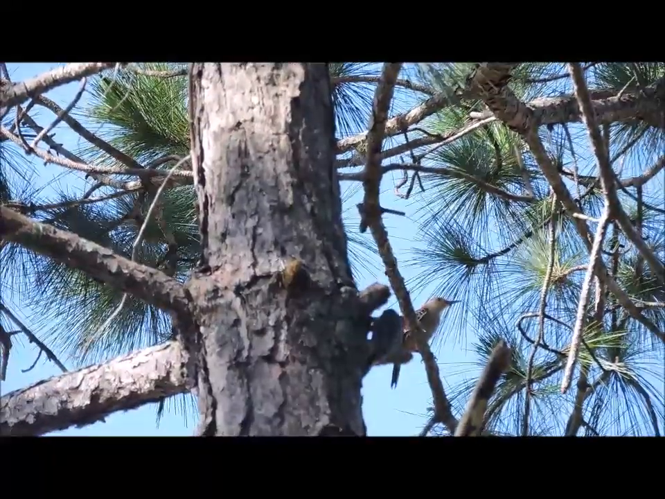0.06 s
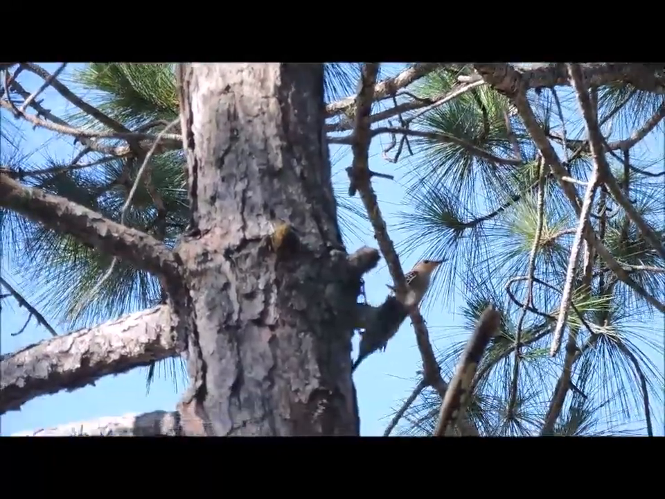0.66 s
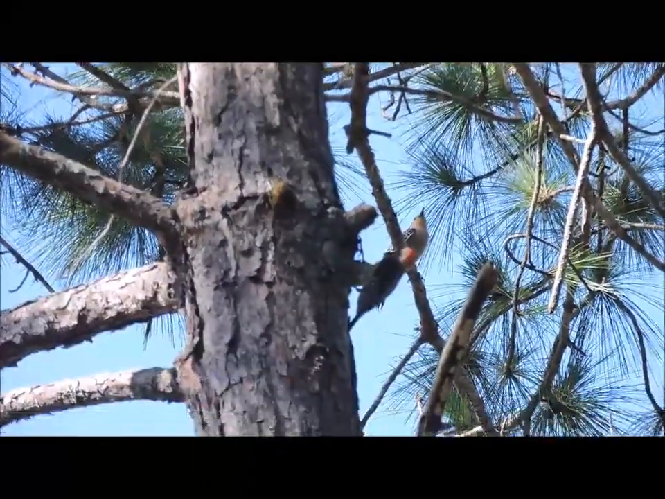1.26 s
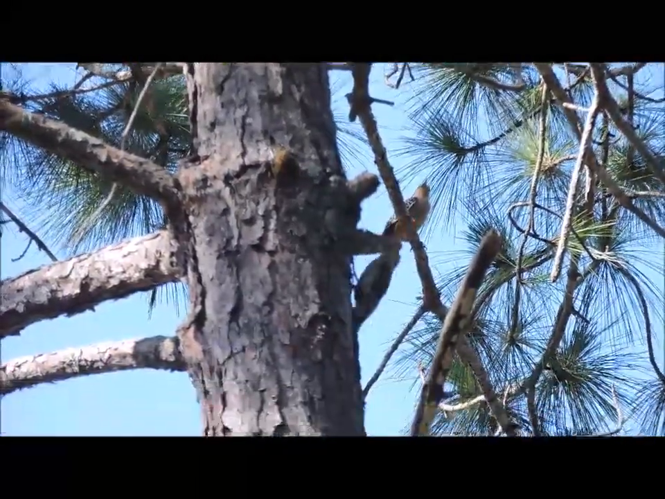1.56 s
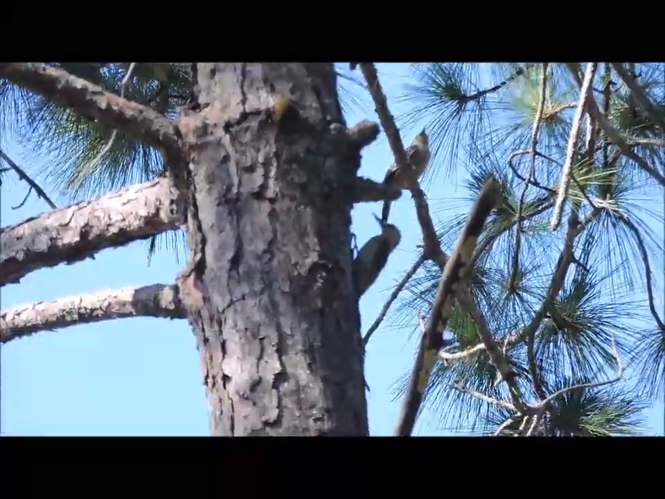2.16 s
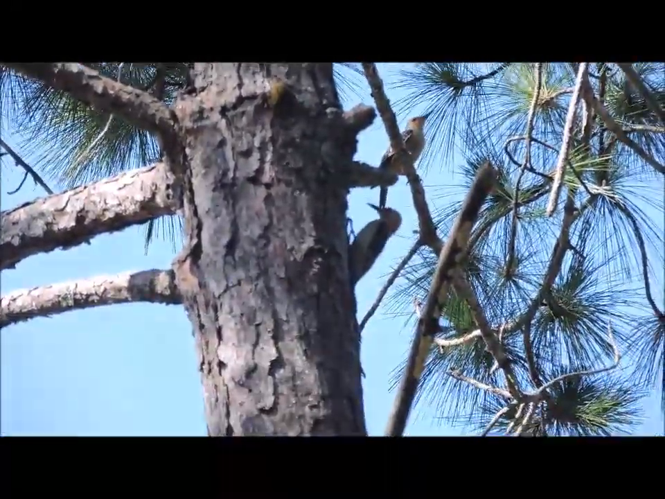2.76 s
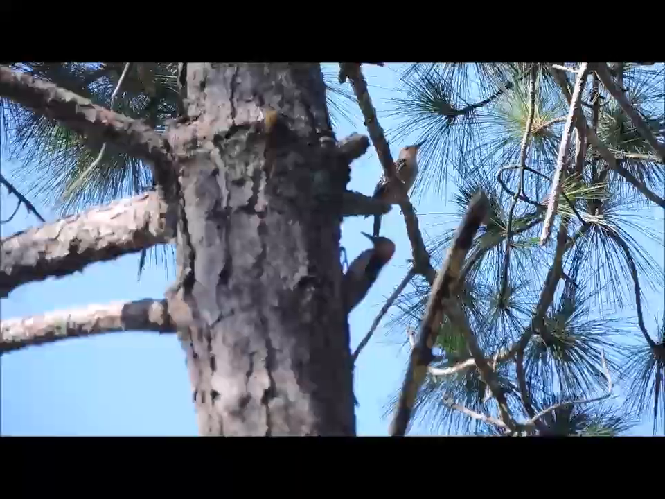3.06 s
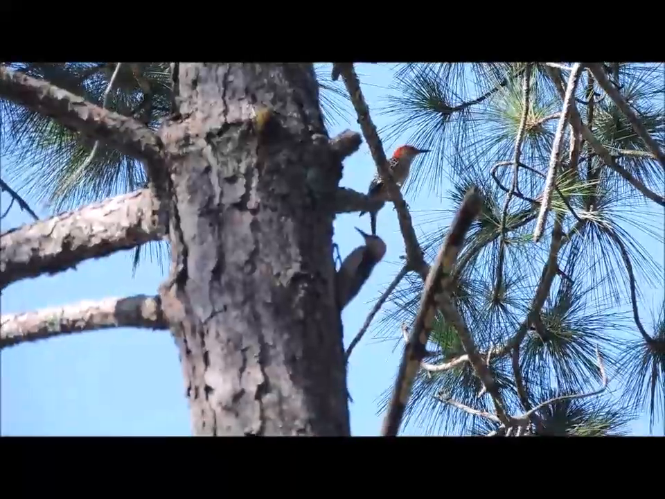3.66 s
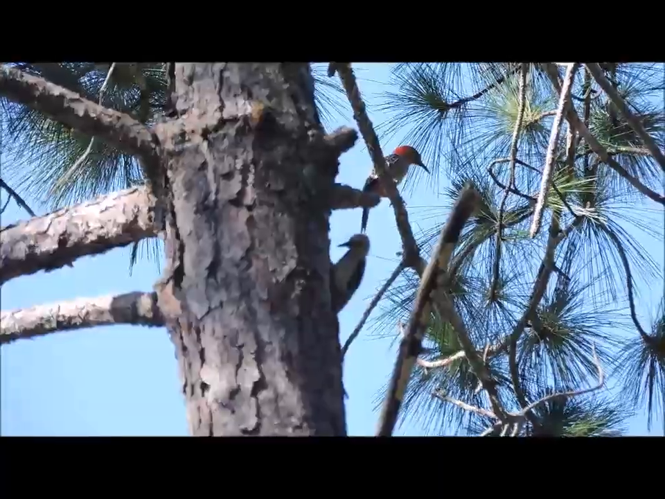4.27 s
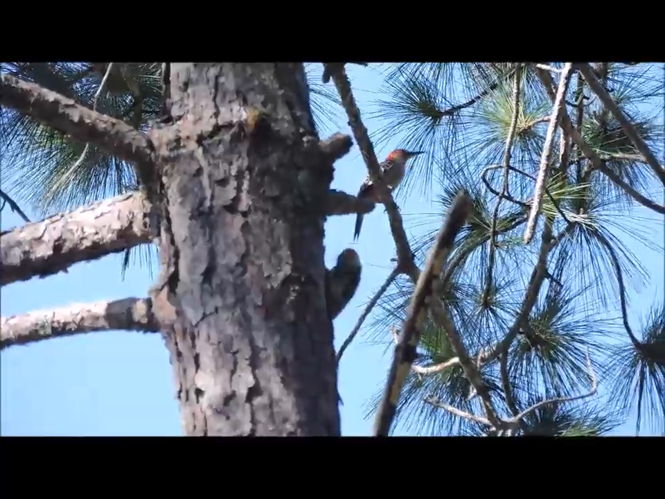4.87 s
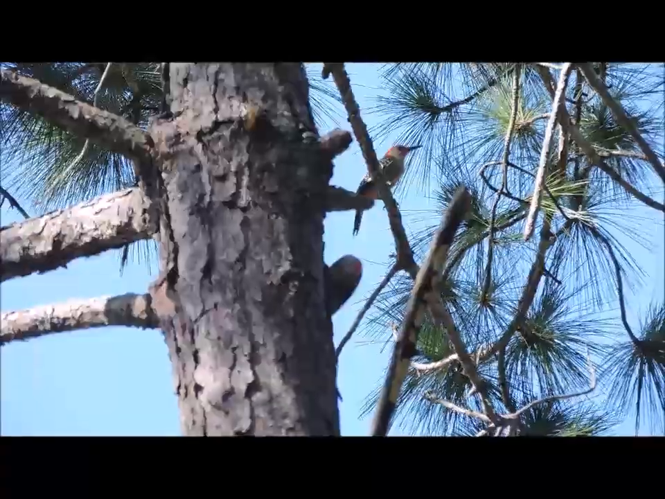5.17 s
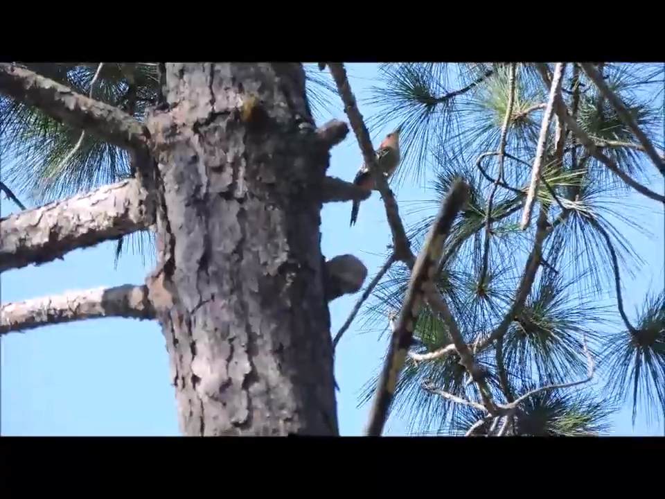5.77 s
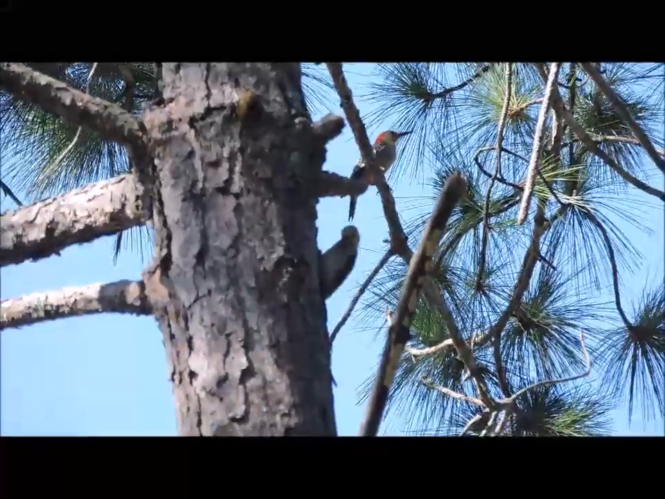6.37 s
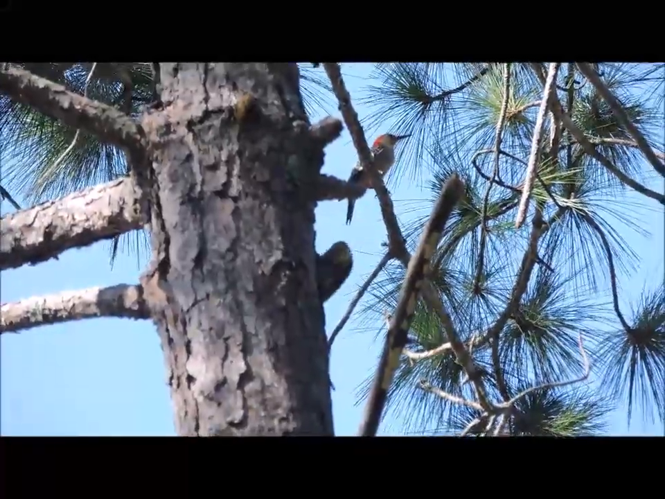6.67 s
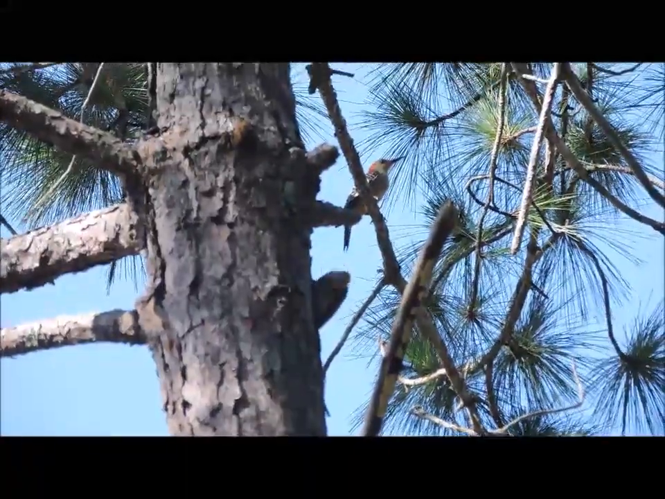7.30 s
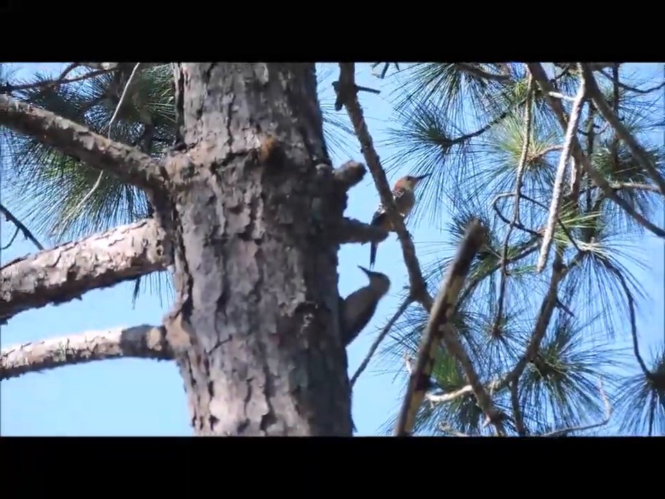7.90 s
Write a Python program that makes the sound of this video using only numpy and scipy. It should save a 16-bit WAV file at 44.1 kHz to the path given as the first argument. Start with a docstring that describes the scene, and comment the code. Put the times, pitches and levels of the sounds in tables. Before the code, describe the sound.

A brief low whump opens, and a woodpecker calls twice in soft, swooping whistles, a little to the left and lightly scattered by the trees. Four distant thuds follow, the last two louder with a faint scrape between them. Three quick, sharp chirps come next, then a final far-off knock. Low wind rumble, soft air in the pine needles and a faint distant hum continue underneath.

```python
"""Woodpeckers in a pine, over a low outdoor rumble, air in the needles and a faint machine hum.
A short, rough whump comes first, then two soft wavering calls, each a whistle scattered by the trees.
Four dull knocks carry from far off, with a faint rustle before the fourth. Three sharp chirps follow,
each a whistled arch and a zigzag of pitch. One last knock sounds near the end."""
import sys
import numpy as np
from scipy import signal
from scipy.fft import rfft, irfft, next_fast_len
from scipy.io import wavfile
from scipy.ndimage import map_coordinates

SR = 44100
rng = np.random.default_rng(int(sys.argv[2]) if len(sys.argv) > 2 else 0)


def dump(signal):
    """Clip the signal to [-1, 1] and save it as 16-bit WAV at the path in sys.argv[1]."""
    limited = np.clip(np.atleast_2d(signal).T, -1, 1)
    pcm = np.round(limited * 32767).astype(np.int16)
    wavfile.write(sys.argv[1], SR, pcm)


N = 350154

ARCH_ATTACK_S, RUN_UP_S, CHIRP_RELEASE_S = .026, .021, .0016


def wavering_calls():
    """Two calls of two slow swoops each; the last low note softens and breaks into a fast quiver."""
    # swoops, two to a call, each a high note that breaks to a low one:
    # start_s, rise_s, until_break_s, high_hz, drift_hz_per_s, low_hz, high_db, low_db
    swoops = [(0.710, 0.025, .068, 2450, -4500, 1580, -51, -54),
              (0.836, .052, .079, 2500, 0, 1662, -45.5, -51),
              (1.193, .020, .066, 2400, 3500, 1630, -51, -51.5),
              (1.318, .044, .074, 2620, -6500, 1570, -46.5, -52.5)]
    # the shape of each call: length_s, quiver_depth_hz, quiver_length_s, overtone_db
    wavers = [(0.338, 150, .098, -26), (0.342, 120, 0.055, -22.5)]
    attack_s, release_s, shimmer_db = .009, .014, 1.5
    quiver_rate_hz, quiver_lift_hz = 98, 74
    out = np.zeros((2, N))
    for pair, (length_s, depth_hz, quiver_s, overtone_db) in zip((swoops[:2], swoops[2:]), wavers):
        t = pair[0][0] + np.arange(0, length_s, 1 / SR)
        age, remaining = t - t[0], t[-1] - t
        hz, gain = swooping(t, pair)
        gain *= amp(shimmer_db * wobble(90)[:len(t)])  # the voice is never quite steady
        gain *= ramp(age / attack_s) * ramp(remaining / release_s)
        swell = ramp(2 * (1 - remaining / quiver_s))
        cycle = 2 * np.pi * quiver_rate_hz * (.003 - remaining)
        quiver = swell * (np.sin(cycle) + .18 * np.sin(2 * cycle))  # a quick rise and a slower fall
        tremolo = amp(3.5 * quiver)
        strain = np.interp(hz, [1800, 2700], [.010, .026])  # high notes are rougher
        bright_db = overtone_db + 2 - 40 * age  # the tone grows purer as the call goes on
        hz = hz + quiver_lift_hz * swell + depth_hz * quiver
        call = whistle(hz, gain * tremolo, strain, [bright_db - 6, bright_db, bright_db])
        add(out, t[0], among_trees(call, near_db=-14.5, far_db=-11.5))
    return out


def swooping(t, swoops):
    """Pitch and gain of a voice that climbs to each high note, catches, and lands hard on the low one."""
    scoop_hz, fall_s = 1198, .010
    catch_db, catch_s = -5, .0099
    accent_db, accent_s = 14, .023
    hz, db = scoop_hz, swoops[0][-2]  # the opening scoop is as loud as the first high note
    for start_s, rise_s, break_s, high_hz, drift, low_hz, high_db, low_db in swoops:
        from_break = t - start_s - break_s
        after = np.maximum(from_break, 0)
        note_hz = low_hz + (high_hz - low_hz) * np.exp(-after / fall_s)
        note_hz += drift * np.minimum(from_break, 0)
        landing_db = low_db + accent_db * np.exp(-after / accent_s)
        note_db = high_db + ease(from_break / catch_s) * (landing_db - high_db)
        note_db += catch_db * np.exp(-(from_break / catch_s + .5) ** 2)
        climb = (t - start_s) / rise_s
        hz = hz + ease(climb) * (note_hz - hz)
        db = db + ease(2 * climb) * (note_db - db)
    return hz, amp(db)


def chirps():
    """An arch and then a zigzag, three times, each pitched and paced a little differently."""
    # chirps: first_spike_s, arch_hz, spike_hz, zigzag_db, arch_db, arch_top_to_spike_s, spike_to_end_s
    gestures = [(4.7528, 3360, 3050, -39.5, -46, .059, 0.022),
                (4.977, 3380, 3170, -37.5, -41.5, .062, 0.027),
                (5.2512, 3500, 3110, -38, -41.5, .064, 0.025)]
    out = np.zeros((2, N))
    for spike_s, arch_hz, spike_hz, zigzag_db, arch_db, lead_s, end_s in gestures:
        opening = arch(arch_hz, arch_db, lead_s - RUN_UP_S)
        add(out, spike_s - lead_s - ARCH_ATTACK_S, among_trees(opening, near_db=-10, far_db=-9))
        closing = zigzag(spike_hz, zigzag_db, end_s)
        add(out, spike_s - RUN_UP_S, among_trees(closing, near_db=-12, far_db=-9))
    return out


def arch(top_hz, db, fall_s, rest_hz=2220):
    """A whistle that swells evenly to its top pitch, then falls away in a bell curve and fades."""
    climb_hz_per_s, turn_s, slope_db_per_s = 18000, .018, 380
    t = np.arange(-ARCH_ATTACK_S, fall_s, 1 / SR)
    falling_hz = rest_hz + (top_hz - rest_hz) * np.exp(-(t / turn_s) ** 2)
    hz = np.where(t < 0, top_hz + climb_hz_per_s * t, falling_hz)
    edges = ramp(np.minimum(t - t[0], fall_s - t) / CHIRP_RELEASE_S)
    gain = amp(db - slope_db_per_s * np.abs(t)) * edges
    bright_db = -33.5 + 20 * np.exp(-((t - .016) / .012) ** 2)  # reediest as it turns down
    return whistle(hz, gain, jitter=.008, overtones_db=[bright_db, bright_db - 9, -30])


def zigzag(spike_hz, db, end_s, rest_hz=2220):
    """A whistle that slides in from below and flicks up to quick spikes of pitch."""
    gap_s, rise_s, fall_s = .015, .005, .0025
    run_up_hz, fade_db_per_s = 522, 150
    t = np.arange(-RUN_UP_S, end_s, 1 / SR)
    to_next = np.where(t < 0, -t, -t % gap_s)
    flick_up = np.exp(-to_next / rise_s)
    flick_down = (t > 0) * np.exp(-(t % gap_s / fall_s) ** 2)
    spike = np.maximum(flick_up, flick_down)
    hz = rest_hz + (spike_hz - rest_hz) * spike - run_up_hz * ramp(-t / RUN_UP_S) ** 2
    gain = amp(db - 3 * spike - fade_db_per_s * np.maximum(t, 0))  # the voice thins at each tip
    gain *= ramp(1 + t / RUN_UP_S) * ramp((end_s - t) / CHIRP_RELEASE_S)
    return whistle(hz, gain, jitter=.014, overtones_db=[-31, -35, -27])


def whistle(hz, gain, jitter, overtones_db):
    """A nearly pure syrinx tone; overtones glint as they cross the resonances of throat and beak."""
    # resonances of throat and beak: frequency_hz, gain_db
    throat = [(3500, -12), (5200, -15), (6200, -6), (6750, 0), (7300, -8), (8400, -20), (10000, -5),
              (12000, -20)]
    unrest = unit(signal.lfilter([1], [1, -.97], rng.standard_normal(len(hz))))
    phase = 2 * np.pi * np.cumsum(hz * (1 + jitter * unrest)) / SR
    overtones = sum(amp(db + along(throat, k * hz)) * np.sin(k * phase)
                    for k, db in enumerate(overtones_db, start=2))
    return np.sqrt(2) * gain * (np.sin(phase) + overtones)


def among_trees(call, near_db, far_db):
    """A call arrives on the left first, bounces off the ground and scatters off limbs and the grove."""
    # where the perch sits in the stereo image: frequency_hz, left_lead_rad, left_minus_right_db
    perch = [(500, .1, 0), (1700, 1.35, .9), (2500, 2.38, 2.9), (3300, 2.78, 3.8), (6700, 5.2, 3)]
    # how long the trees answer: frequency_hz, t60_s
    grove = [(100, 0.38), (500, 0.89), (2500, 0.32), (8000, 0.18)]
    call = np.pad(call, (0, SR // 2))
    sides = np.array([[1], [-1]])
    lead, balance = np.array(perch)[:, :2], np.array(perch)[:, ::2]
    bounce_gain, bounce_s = np.array([[.3], [.22]]), np.array([[.00652], [.00668]])
    direct = lambda hz: np.exp(.5j * sides * along(lead, hz)) * amp(sides * along(balance, hz) / 2)
    ground = lambda hz: bounce_gain * np.exp(-2j * np.pi * hz * bounce_s)
    early = filtered(call, lambda hz: direct(hz) + ground(hz))
    t = np.arange(SR // 2) / SR
    near = rng.standard_normal((2, len(t))) * decay(t, t60_s=.1) * attack(t, .0038)
    far = dying(rng.standard_normal((2, len(t))), grove) * attack(t, .012)
    answer = (amp(near_db) * unit(near) + amp(far_db) * unit(far)) / np.sqrt(len(t))
    return early + signal.fftconvolve(call[None], answer, axes=1)[:, :len(call)]


def knocks():
    """Distant blows: a short thud, then its echo rolling among the trees."""
    # far knocks: start_s, level_db, tilt_db_per_octave, bass_db
    blows = [(2.547, -49.5, 0, -8), (3.139, -51, 2.3, -4), (3.543, -40, -.5, 1), (3.947, -39, .7, 2.5),
             (7.791, -47.5, 2.3, -10)]
    # the dull body of a knock: frequency_hz, relative_db
    body = [(40, -4), (85, 14), (160, 6), (230, -2), (340, 5.5), (500, -4.5), (750, -4.5), (1200, -15.5),
            (2100, -16.5), (3200, -42), (8000, -65)]
    # the echo hangs on longest in the bass: frequency_hz, t60_s
    echo_decay = [(100, 0.94), (400, 0.59), (2000, 0.42)]
    out, t = np.zeros((2, N)), np.arange(SR) / SR
    for start_s, db, tilt_db, bass_db in blows:
        colour = [(hz, level + tilt_db * np.log2(hz / 300) + bass_db * (hz < 200)) for hz, level in body]
        thud = diffuse(colour, size=SR) * decay(t, t60_s=.031)
        thud *= amp(5.5) / np.sqrt(np.mean(thud[:, t < .01] ** 2) * 2)  # every blow lands with full punch
        echo = amp(-1) * dying(diffuse(colour, size=SR), echo_decay) * attack(t, .007)
        add(out, start_s, amp(db) * (thud * attack(t, .00078) + echo))
    return out


def whump(start_s=.512, length_s=.074, level_db=-40.5):
    """One short, low, rough downward swoop."""
    top_hz, sag_hz_per_s = 470, 4400
    attack_s, release_s, fade_db_per_s = .019, .01, 230
    out, t = np.zeros((2, N)), np.arange(0, length_s, 1 / SR)
    gain = amp(level_db - fade_db_per_s * np.maximum(t - attack_s, 0))
    gain *= ramp(t / attack_s) * ramp((length_s - t) / release_s)
    roughness = 1 + .29 * wobble(400)[:len(t)]
    phase = 2 * np.pi * np.cumsum((top_hz - sag_hz_per_s * t) * roughness) / SR
    add(out, start_s, among_trees(gain * np.sin(phase), near_db=-13, far_db=-19))
    return out


def rustle(start_s=3.703, level_db=-57):
    """A faint, short scrape: a band of noise that fades away."""
    band = [(700, -28), (1200, -3), (1750, 5), (2400, -26), (5000, -45)]  # frequency_hz, relative_db
    out, t = np.zeros((2, N)), np.arange(SR // 2) / SR
    envelope = amp(level_db) * decay(t, t60_s=.55) * attack(t, .0046)
    add(out, start_s, envelope * diffuse(band, size=len(t)))
    return out


def wind(rumble_db=-50.5, air_db=-56):
    """Low rumble that swells in the gusts, and air in the needles, the treble a little to the left."""
    # colour of the outdoor rumble: frequency_hz, relative_db
    rumble_colour = [(8, -9), (28, -2.5), (42, -3), (56, 1), (78, -0.5), (97, -1), (130, -3), (160, -3),
                     (205, -7), (260, -10), (340, -12), (500, -22.5), (1200, -48.5)]
    # colour of air in the needles: frequency_hz, relative_db
    air_colour = [(150, -27.5), (400, -1.5), (550, -3), (720, -1.5), (1000, -3), (1400, -6.5), (2000, -9.5),
                  (2800, -13.5), (4000, -19), (6500, -24), (9000, -27.5), (16000, -30.5)]
    # gusts that lift the rumble: peak_s, half_length_s, rise_db
    gusts = [(3.9, 0.23, 1.5), (7.55, 0.23, 3)]
    t = np.arange(N) / SR
    gust_db = sum(db * np.exp(-((t - peak_s) / half_s) ** 2) for peak_s, half_s, db in gusts)
    rumble = amp(rumble_db + gust_db + .29 * wobble(5.9)) * diffuse(rumble_colour, size=N)
    air = amp(air_db + .26 * wobble(2.94)) * diffuse(air_colour, size=N)
    lean_left = lambda hz: amp(np.array([[.5], [-.5]]) * along([(700, 0), (2400, 1.3)], hz))
    return rumble + filtered(air, lean_left)


def machine(drift_hz=2.6, fade_db=2.75):
    """A far-off hum; each tone fades and drifts on its way through the moving air."""
    # tones of the machine: pitch_hz, level_db
    hum = [(30, -68.5), (57, -64), (95, -63.5), (117, -65.5), (148, -66), (236, -60.5)]
    phase = lambda hz: 2 * np.pi * np.cumsum(hz + drift_hz * wobble(14)) / SR
    return sum(np.sqrt(2) * amp(db + fade_db * wobble(11)) * np.sin(phase(hz)) for hz, db in hum)


def diffuse(spectrum, size):
    """Stereo noise of rms 1 arriving from all around: centred in the bass, wide in the treble."""
    # likeness of left and right: frequency_hz, correlation (-1 to 1)
    alike = [(60, 0.95), (150, 0.97), (290, 0.83), (640, 0.68), (1400, 0.23), (2800, -0.27), (6000, -0.027),
             (15000, -0.16)]
    width = lambda hz: np.arccos(np.clip(along(alike, hz), -1, 1)) / 2
    colour = lambda hz: amp(along(spectrum, hz)) * [np.cos(width(hz)), np.sin(width(hz))]
    mid, side = filtered(rng.standard_normal((2, size)), colour)
    return unit(np.array([mid + side, mid - side]))


def dying(noise, t60_curve):
    """Each frequency of a noise fades with its own t60."""
    hz, t, bands = signal.stft(noise, SR, nperseg=256)
    faded = bands * decay(t, along(t60_curve, hz)[:, None])
    return signal.istft(faded, SR, nperseg=256)[1][:, :noise.shape[1]]


def amp(db):
    return 10 ** (np.asarray(db) / 20)


def unit(x):
    return x / np.sqrt(np.mean(x ** 2) + 1e-20)


def attack(t, rise_s):
    return 1 - np.exp(-t / rise_s)


def decay(t, t60_s):
    return amp(-60 * t / t60_s)


def ramp(x):
    """Straight from 0 to 1, then held."""
    return np.clip(x, 0, 1)


def ease(x):
    """A smooth step from 0 to 1."""
    return (1 - np.cos(np.pi * ramp(x))) / 2


def along(points, hz):
    """Read a curve of (frequency_hz, value) points on a log axis."""
    knots_hz, values = np.transpose(points)
    return np.interp(np.log(hz + 1), np.log(knots_hz + 1), values)


def wobble(rate):
    """A smooth random curve, rate knots a second."""
    return map_coordinates(rng.standard_normal(int(N * rate / SR) + 4), [np.arange(N) * rate / SR])


def filtered(x, response):
    """Shape a sound with a complex frequency response."""
    size = next_fast_len(x.shape[-1] + SR // 4)
    return irfft(rfft(x, size) * response(np.fft.rfftfreq(size, 1 / SR)), size)[..., :x.shape[-1]]


def add(track, start_s, sound):
    """Mix a sound into a track from start_s on."""
    part = track[..., round(start_s * SR):][..., :sound.shape[-1]]
    part += sound[..., :part.shape[-1]]


def scene():
    """The birds and the scattered small sounds over a bed of hum and wind."""
    return wavering_calls() + chirps() + knocks() + rustle() + whump() + machine() + wind()


def record(dry):
    """A brick-wall low-pass takes off the very top."""
    return filtered(dry, lambda hz: hz < 15850)


dry = scene()
out = record(dry)
dump(out)
```